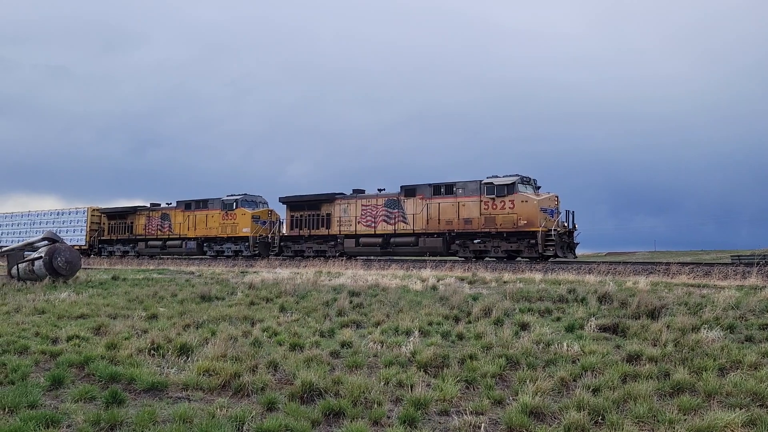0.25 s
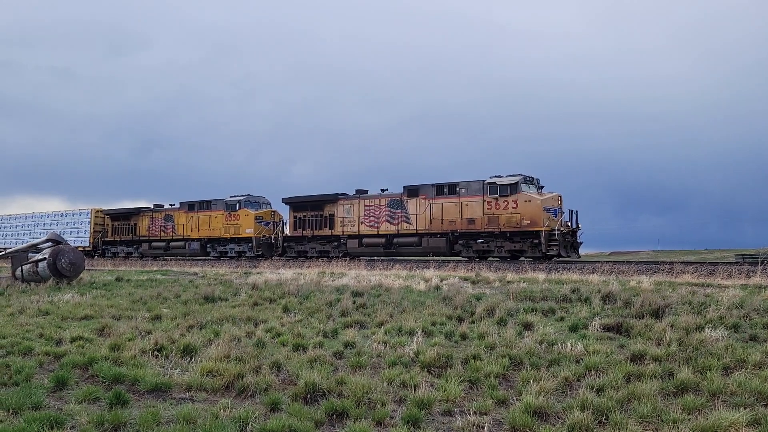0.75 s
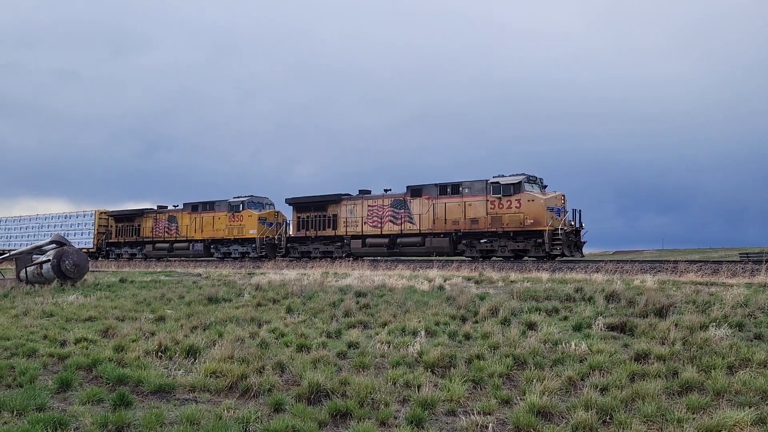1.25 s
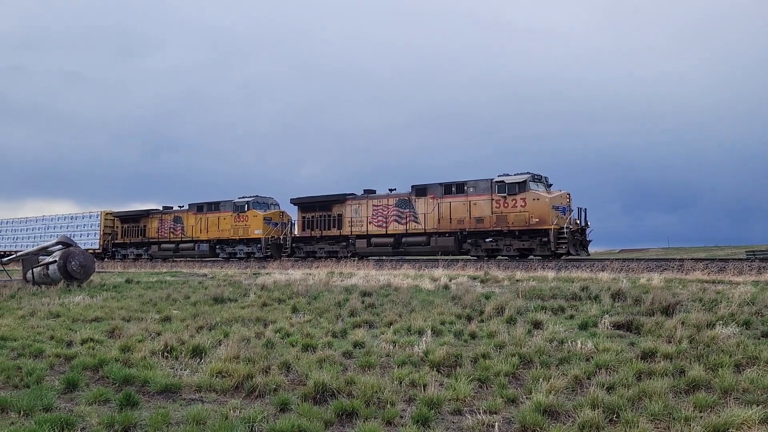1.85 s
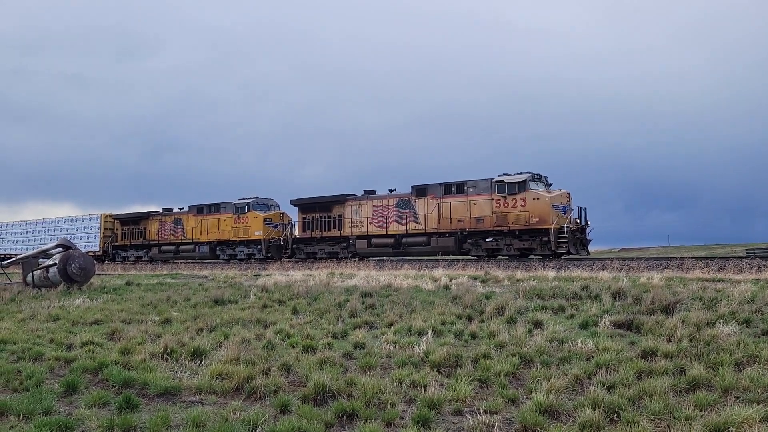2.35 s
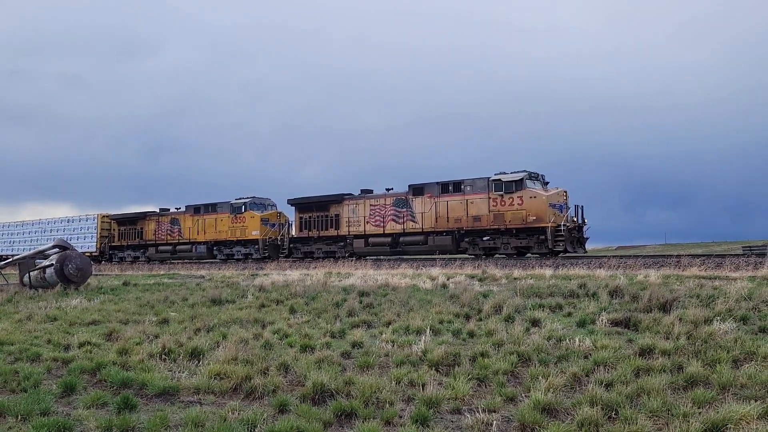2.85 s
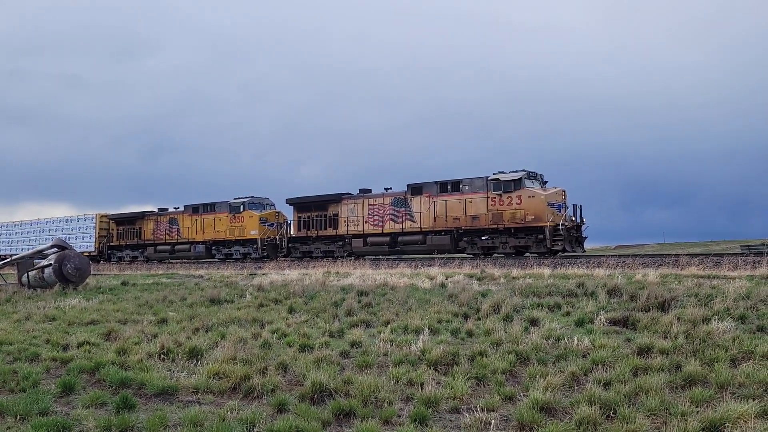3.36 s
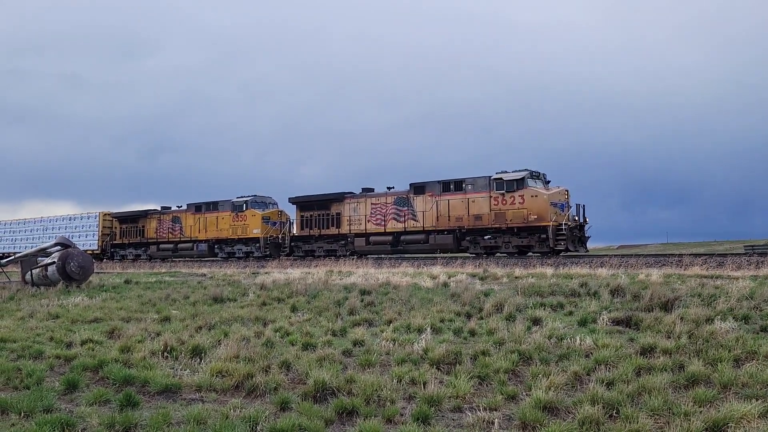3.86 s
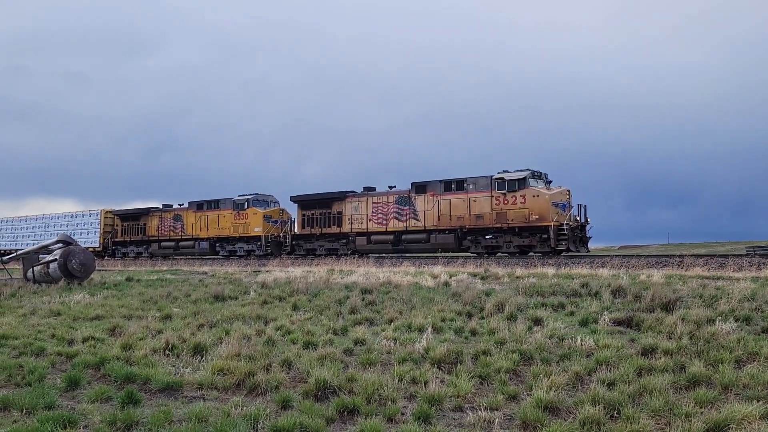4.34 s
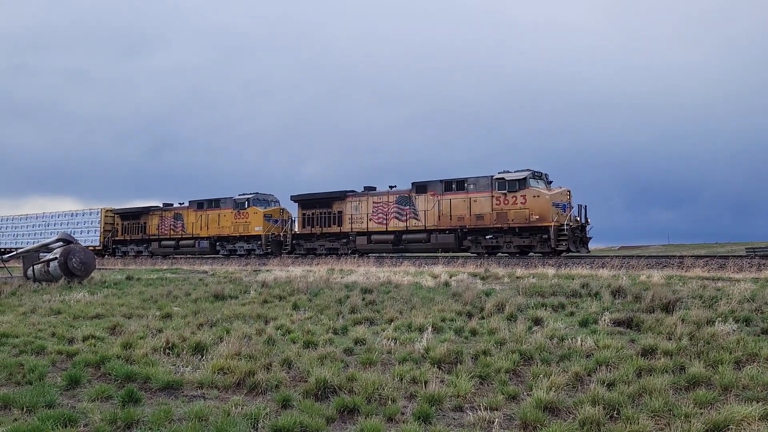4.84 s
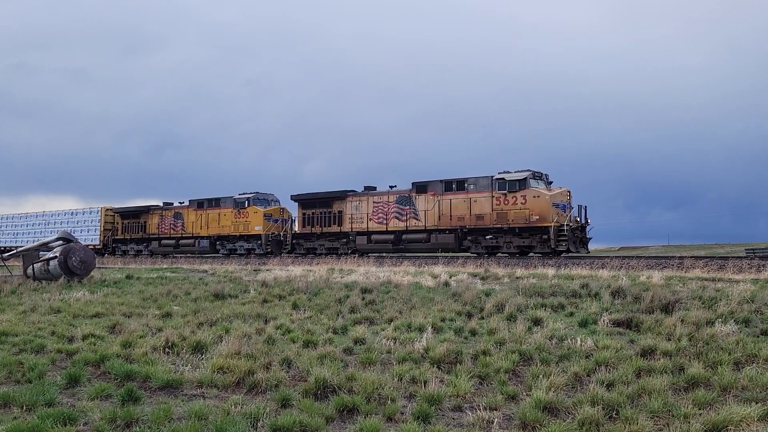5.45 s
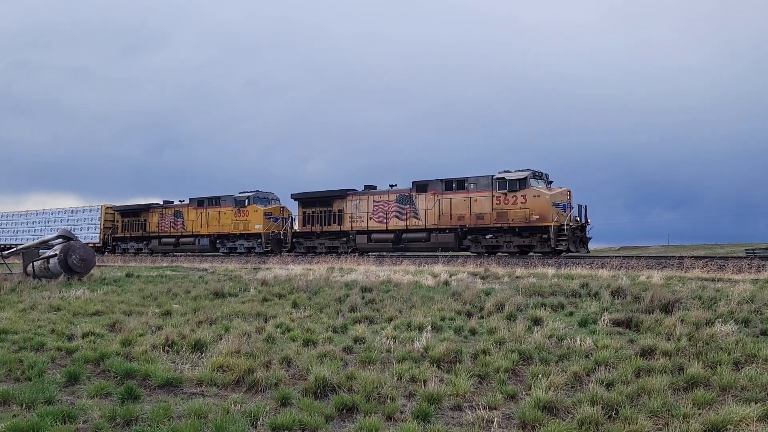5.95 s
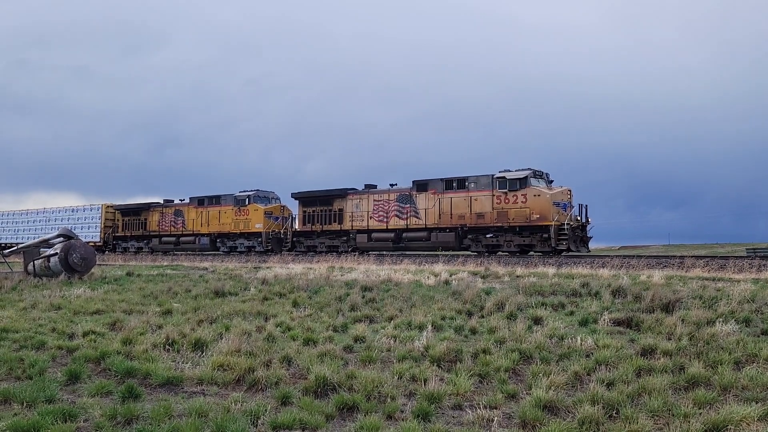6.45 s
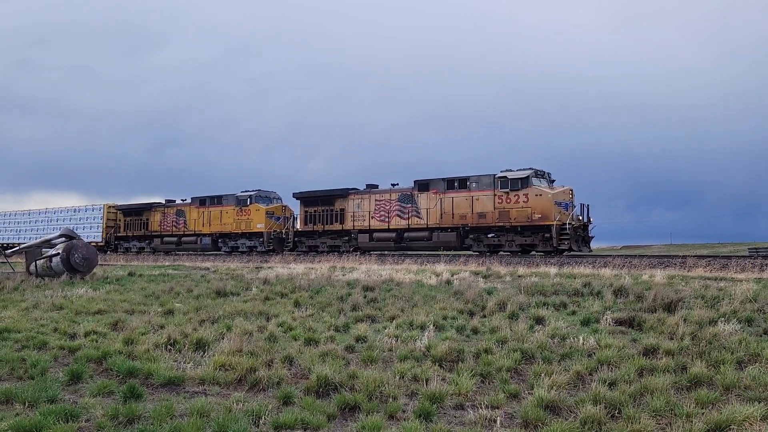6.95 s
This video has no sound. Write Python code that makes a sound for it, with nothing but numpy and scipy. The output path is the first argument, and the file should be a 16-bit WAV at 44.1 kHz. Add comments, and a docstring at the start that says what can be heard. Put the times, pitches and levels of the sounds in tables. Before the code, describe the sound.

Two diesel locomotives creep past at idle on open grassland. Their exhaust throbs unevenly on one deep note under roaring fans, a fast engine clatter and a thin whine that fades in and out. Air valves spit sharply at odd moments over a light hiss, with faint metallic ticks and brief rattles of loose parts. Wind buffets the microphone, mostly on the right, gusting more often in the second half.

```python
"""Two diesel locomotives creep past at idle on open grassland, at the head of a freight train.
Their exhaust surges unevenly on one deep note, with faint metallic ticks mostly in time with the engine.
Fans roar, a blower whines, the engines shake loose parts, and air valves spit at odd moments.
Wind buffets the microphone, mostly on the right."""
import sys
import numpy as np
from scipy import signal
from scipy.fft import rfft, irfft
from scipy.io import wavfile

SR = 44100
rng = np.random.default_rng(int(sys.argv[2]) if len(sys.argv) > 2 else 0)


def dump(signal):
    """Clip the signal to [-1, 1] and save it as 16-bit WAV at the path in sys.argv[1]."""
    limited = np.clip(np.atleast_2d(signal).T, -1, 1)
    pcm = np.round(limited * 32767).astype(np.int16)
    wavfile.write(sys.argv[1], SR, pcm)


N = 317520
T = np.arange(N) / SR
HZ = np.maximum(np.fft.rfftfreq(N, 1 / SR), 1)
ENGINE_LAG_MS, AIR_LAG_MS = .18, .62   # how much later these sounds reach the left side
TO_RIGHT = np.array([[-.5], [.5]])   # splits a dB difference: left down, right up


def from_db(db):
    """Turn decibels into a gain."""
    return 10 ** (np.asarray(db) / 20)

def rms_one(x):
    """Scale a signal to an average power of 1."""
    return x / np.sqrt(np.mean(x ** 2) + 1e-20)

def in_time(rows):
    """Join a table's points into one curve over time for each level column."""
    times, *columns = np.transpose(rows)
    return [np.interp(T, times, column) for column in columns]

def swell(peak_s, length_s):
    """A smooth rise and fall around one moment."""
    return np.exp(-np.minimum(((T - peak_s) / length_s) ** 2, 40))

def strokes(rate_hz, first_s):
    """A regular beat that swings between -1 and 1."""
    return np.cos(2 * np.pi * rate_hz * (T - first_s))

def drift(rate_hz):
    """A random wobble of about 1 either way, mostly slower than rate_hz."""
    return rms_one(irfft(rfft(rng.standard_normal(N)) / (1 + (HZ / rate_hz) ** 2), N))

def colour(points):
    """Join a table's points into dB at every pitch, falling steeply past the last."""
    hz, db = np.transpose(points)
    return np.interp(np.log(HZ), np.log(hz), db) - 20 * np.maximum(np.log2(HZ / hz[-1]), 0)

def band(hz, width_hz):
    """One steep-sided band, in dB at every pitch."""
    return -20 * np.log10(1 + ((HZ - hz ** 2 / HZ) / width_hz) ** 4)

# How the microphone's two sides differ: pitch_hz, left_minus_right_db
MIC_BALANCE = [(60, 6), (98, -4), (160, 5.5), (260, 0.5), (430, -1.5), (700, 0), (1140, -7), (1860, -1),
               (3040, -0.5), (3900, -8.5), (4970, -9.5), (8110, 1), (13200, -6.5)]
def noise(spectrum_db, alike, lag_ms=0):
    """Shaped stereo noise; the share `alike` reaches both sides, the left one lag_ms later."""
    shared, *own = rfft(rng.standard_normal((3, N)))
    direct = np.array([shared * np.exp(-2j * np.pi * HZ * lag_ms / 1000), shared])
    both = np.sqrt(alike) * direct + np.sqrt(1 - alike) * np.array(own)
    return rms_one(irfft(both * from_db(spectrum_db - colour(MIC_BALANCE) * TO_RIGHT), N))


# Booms from the exhaust stack: peak_s, level_db, length_s, pitch_hz
EXHAUST_SURGES = [(0.002, -17, 0.054, 58), (0.694, -25, 0.022, 63), (0.796, -20, 0.03, 64),
                  (0.927, -21, 0.019, 66), (1.102, -21, 0.053, 64), (1.268, -27, 0.016, 60),
                  (1.726, -26.5, 0.057, 62.3), (1.877, -24, 0.041, 62.4), (2.009, -21, 0.021, 64),
                  (2.158, -22.5, 0.05, 64), (2.586, -24.5, 0.012, 62.5), (2.677, -28, 0.019, 59),
                  (2.816, -23.5, 0.029, 57), (2.955, -22, 0.027, 66.4), (3.078, -18.5, 0.02, 66.5),
                  (3.21, -12.5, 0.013, 69), (4.025, -19.5, 0.032, 61.7), (4.152, -26, 0.028, 62),
                  (4.331, -14.5, 0.014, 74.4), (4.4, -30, 0.026, 63), (4.51, -28, 0.03, 68.6),
                  (4.606, -31, 0.037, 66.3), (4.91, -21.5, 0.025, 62.7), (4.978, -11.5, 0.0098, 67),
                  (5.1, -31, 0.036, 68), (5.226, -25.5, 0.01, 65), (5.39, -21.5, 0.065, 65),
                  (5.563, -22.5, 0.013, 65.4), (5.744, -26.5, 0.072, 65.7), (6.294, -26, 0.015, 65),
                  (6.457, -22.5, 0.052, 62.7), (6.818, -30, 0.056, 62), (6.981, -23, 0.011, 58),
                  (7.126, -31, 0.021, 65)]
# Tone of the engine blocks' rumble: pitch_hz, relative_db
RUMBLE_TONE = [(15, -30), (32, -4), (60, 9.5), (95, -2.5), (140, -8.5), (185, -8), (260, -25), (380, -17.5),
               (520, -16), (800, -61)]
def exhaust(firing_hz=64.2, note_db=-33, rumble_db=-34):
    """Each surge is a few strong firings in step with the engine's note, over a low rumble."""
    cycles = firing_hz * T + .1 * drift(4.5)   # the timing strays a little
    surges = 0
    for peak_s, db, length_s, hz in EXHAUST_SURGES:
        firings = np.cos(2 * np.pi * (cycles + (hz - firing_hz) * (T - peak_s)))
        surges += from_db(db) * swell(peak_s, length_s) * firings
    note = from_db(note_db) * np.cos(2 * np.pi * cycles)
    rumble = from_db(rumble_db) * noise(colour(RUMBLE_TONE), alike=1, lag_ms=ENGINE_LAG_MS)
    return np.sqrt(2) * (surges + note) * from_db(TO_RIGHT) + rumble

# Loudness of the drone: time_s, level_db
DRONE_LEVELS = [(0.0, -47), (0.52, -47), (0.96, -46.5), (1.7, -55), (2.95, -58), (3.11, -44.5), (3.79, -58),
                (4.47, -46.5), (4.91, -50), (7.2, -55.5)]
def drone(gain_db=-1):
    """A hollow drone swells and fades above the rumble."""
    hollow = noise(band(hz=350, width_hz=170), alike=.25) * [[1], [-1]]   # partly out of phase
    return from_db(in_time(DRONE_LEVELS)[0] + gain_db) * hollow

# Loudness of the machinery: time_s, roar_db, clatter_db, hiss_db
MACHINE_LEVELS = [(0.0, -41, -44, -54.5), (0.44, -41.5, -44, -54.5), (1.0, -40, -42.5, -57),
                  (1.26, -41.5, -42, -56.5), (1.98, -40.5, -43.5, -55), (2.59, -40.5, -43.5, -57.5),
                  (3.31, -40.5, -43, -54.5), (3.89, -43, -44.5, -58), (4.27, -40, -43.5, -56.5),
                  (4.91, -41.5, -44.5, -56), (5.23, -41.5, -44.5, -57.5), (5.71, -42.5, -44.5, -56.5),
                  (6.48, -42, -45.5, -58), (7.2, -41.5, -43.5, -56.5)]
# Tone of the fans: pitch_hz, relative_db
FAN_TONE = [(250, -24), (430, -22), (560, -3.5), (660, -1.5), (790, 1.5), (900, -2.5), (990, -8),
            (1150, -17.5), (1600, -42.5)]
# Tone of the clatter: pitch_hz, relative_db
CLATTER_TONE = [(700, -41.5), (1050, -11), (1220, -9.5), (1340, -7), (1480, -9), (1750, -8.5), (1950, -8),
                (2150, -16.5), (2500, -24), (3000, -25), (4500, -65.5)]
KNOCK_HZ = 14.89
def fans_and_clatter(clatter_gain_db=.84, grain_db=1.45):
    """Fans roar while the engine's valve gear knocks twice a turn, once harder."""
    roar_db, clatter_db, _ = in_time(MACHINE_LEVELS)
    knock_db = 1.2 * strokes(KNOCK_HZ, first_s=.02) + .9 * strokes(KNOCK_HZ / 2, first_s=.0027)
    fans = from_db(roar_db + knock_db / 2) * noise(colour(FAN_TONE), alike=.93, lag_ms=ENGINE_LAG_MS)
    clatter_level = from_db(clatter_db + clatter_gain_db + knock_db + grain_db * drift(9.9))
    return fans + clatter_level * noise(colour(CLATTER_TONE), alike=.6, lag_ms=ENGINE_LAG_MS)

# Loudness of the rasp: time_s, level_db
RASP_LEVELS = [(0, -48), (.8, -46), (1.85, -49.5), (2.1, -68), (3.15, -61), (3.4, -47), (4.9, -49),
               (6.6, -44.5), (7.2, -53)]
def rasp():
    """A narrow rasp from the engines fades away for a second and returns."""
    level = from_db(in_time(RASP_LEVELS)[0])
    return level * noise(band(hz=1230, width_hz=130), alike=.6, lag_ms=ENGINE_LAG_MS)

# Loudness of the blower: time_s, level_db
BLOWER_LEVELS = [(0.0, -47.5), (0.42, -49), (0.8, -45.5), (1.35, -53), (1.7, -45.5), (2.38, -62),
                 (2.5, -55), (2.91, -51.5), (3.17, -53.5), (3.65, -48.5), (3.85, -48.5), (4.4, -47),
                 (4.87, -51), (5.15, -45.5), (5.5, -50.5), (5.9, -45), (6.5, -46), (7.2, -57)]
# The blower's three tones: pitch_hz
BLOWER_PITCHES = [592, 806, 1184]
# Strength of each of those tones: relative_db, right_minus_left_db
BLOWER_MIX = [(-1, 12), (-15.5, -16.5), (-9, 14.5)]
def blower_whine(gain_db=-2, waver=.00226, flutter=.00606, fading_db=1.24):
    """The blower's thin tones fade in and out in the moving air."""
    blower_db = in_time(BLOWER_LEVELS)[0] + gain_db
    out = 0
    for hz, (db, right_db) in zip(BLOWER_PITCHES, BLOWER_MIX):
        pitch_hz = hz * (1 + waver * drift(4.94) + flutter * drift(40))
        phase = 2 * np.pi * np.cumsum(pitch_hz) / SR
        left_lag = 2 * np.pi * hz * ENGINE_LAG_MS / 1000 * np.array([[1], [0]])
        level = from_db(blower_db + db + fading_db * drift(2) + right_db * TO_RIGHT)
        out += np.sqrt(2) * level * np.sin(phase - left_lag)
    return out

# Tone of the hiss: pitch_hz, relative_db
HISS_TONE = [(1800, -0.5), (2550, -10), (3250, -2.5), (3900, -3), (4900, -4.5), (5700, -2.5), (6500, -6.5),
             (7400, -9), (8300, -23), (9600, -23.5), (10500, -31.5), (12500, -28), (16000, -43.5)]
def air_hiss(gain_db=-.1, compressor_hz=11.16):
    """Air hisses, a little harder with each compressor stroke and valve knock."""
    rhythm_db = strokes(compressor_hz, first_s=.0014) + .9 * strokes(KNOCK_HZ, first_s=.012)
    level = from_db(in_time(MACHINE_LEVELS)[2] + gain_db + rhythm_db + drift(18))
    return level * noise(colour(HISS_TONE), alike=.21, lag_ms=AIR_LAG_MS)

# The breeze between gusts: time_s, level_db
BREEZE_LEVELS = [(0, -36), (1.1, -32), (1.6, -38), (2.1, -35), (2.7, -33.5), (3.4, -31.5), (3.8, -35.5),
                 (4.6, -29), (5.1, -39), (5.95, -41), (6.4, -33.5), (7.2, -37.5)]
# Gusts that thump the microphone: peak_s, level_db, length_s
WIND_GUSTS = [(0.254, -25.5, 0.056), (0.769, -34.5, 0.35), (3.238, -25, 0.064), (3.541, -26.5, 0.069),
              (4.137, -28.5, 0.073), (4.323, -25, 0.045), (4.549, -28, 0.091), (4.86, -28.5, 0.12),
              (4.972, -25.5, 0.031), (5.368, -26.5, 0.088), (5.716, -26, 0.024), (6.16, -24, 0.077),
              (6.588, -30.5, 0.12), (7.12, -26, 0.014)]
# Tone of the wind: pitch_hz, relative_db
WIND_TONE = [(12, -40.5), (27, -5), (48, 1), (75, -1), (120, -10.5), (190, -18), (280, -28.5), (500, -55),
             (1200, -95.5)]
def wind(right_db=8.5, left_swing=.4, lumps_db=2, tear_db=-12, tear_hz=300):
    """Swirls hit each side, the sheltered left one less; the hardest gusts add a higher, tearing sound."""
    gust_power = sum((from_db(db) * swell(peak_s, length_s)) ** 2 for peak_s, db, length_s in WIND_GUSTS)
    wind_db = 10 * np.log10(from_db(in_time(BREEZE_LEVELS)[0]) ** 2 + gust_power)
    left_db = wind_db.mean() + left_swing * (wind_db - wind_db.mean())
    sides_db = np.array([left_db, wind_db + right_db])
    wobble_db = lumps_db * np.array([drift(6.5), drift(33)])
    buffet = from_db(sides_db + wobble_db) * noise(colour(WIND_TONE), alike=.063)
    tear = noise(-10 * np.log2(HZ / tear_hz) ** 2, alike=0)
    tear_level = from_db(wind_db.max() + tear_db + 1.79 * (sides_db - sides_db.max()))
    return buffet + tear_level * tear

# Notes the steel rings at: pitch_hz, width_hz, struck_db, above_hiss_db
STEEL_NOTES = [(2700, 230, -0.5, -28.5), (3330, 200, 1.5, -18), (3830, 200, -0.5, -20),
               (4860, 410, 1.5, -11), (5320, 190, 2, -17), (5760, 150, -2.5, -25.5), (6180, 480, -4.5, -19)]
# Faint, bright, ringing ticks, mostly in time with the idling engine: peak_s, level_db, brightest_hz
METALLIC_TICKS = [(.272, -62, 4800), (.447, -59, 5800), (.745, -57, 5740), (1.023, -61.5, 5600),
                  (1.424, -58, 4830), (1.61, -56, 5000), (1.708, -60, 5200), (1.818, -59, 5160),
                  (1.969, -59, 5700), (2.157, -60, 5500), (2.24, -58, 3360), (2.327, -60, 4100),
                  (2.943, -61, 4440), (3.969, -61, 4880), (4.309, -64.5, 5600), (4.395, -61, 4200),
                  (6.119, -59.5, 4550), (6.256, -62, 5850)]
def ringing_steel(rise_s=.014, fade_s=.15, reach_octaves=.82, uneven_db=2.5, shimmer_db=2.6):
    """Steel rings faintly all the time; each tick sets off the notes near its own pitch."""
    hiss_db = in_time(MACHINE_LEVELS)[2]
    ticks = np.array([from_db(db - 60 * np.clip(T - peak_s, 0, 1) / fade_s)
                      * np.where(T < peak_s, swell(peak_s, rise_s), 1)
                      for peak_s, db, _ in METALLIC_TICKS])
    tick_hz = np.array(METALLIC_TICKS)[:, 2]
    out = 0
    for hz, width_hz, struck_db, above_hiss_db in STEEL_NOTES:
        closeness = np.exp(-(np.log2(hz / tick_hz) / reach_octaves) ** 2)
        struck = (closeness * from_db(struck_db + uneven_db * rng.standard_normal(len(ticks)))) @ ticks
        steady = from_db(hiss_db + above_hiss_db + shimmer_db * drift(8.2))
        ring_db = np.maximum(band(hz, width_hz), 8 + band(hz, width_hz=55))   # a thin, louder core
        out += steady * noise(ring_db, alike=.4, lag_ms=AIR_LAG_MS)
        out += struck * noise(band(hz, 2 * width_hz), alike=.44, lag_ms=AIR_LAG_MS)
    return out

# Rattles of loose parts: peak_s, level_db, pitch_hz, width_hz, length_s
LOOSE_PARTS = [(0.697, -35.5, 1180, 1000, 0.029), (0.77, -40.5, 1200, 160, 0.021),
               (1.828, -35.5, 1265, 128, 0.016), (2.435, -37, 1830, 198, 0.017),
               (3.916, -40, 1700, 520, 0.03), (5.336, -42.5, 1900, 210, 0.045),
               (5.446, -44.5, 1980, 204, 0.075), (6.13, -40, 1264, 200, 0.02),
               (6.538, -44, 1906, 193, 0.18), (7.13, -39.5, 1332, 795, 0.022)]
def rattles():
    """The engine shakes loose parts; each rings for an instant at one rough pitch."""
    out = 0
    for peak_s, db, hz, width_hz, length_s in LOOSE_PARTS:
        ring = noise(band(hz, width_hz), alike=.81, lag_ms=ENGINE_LAG_MS)
        out += from_db(db) * swell(peak_s, length_s) * ring
    return out

def comb_ripple(delay_ms=1.235, share=.26):
    """Evenly spaced peaks and dips, about 800 Hz apart, colour the spits of air, in dB."""
    return 20 * np.log10(abs(1 + share * np.exp(-2j * np.pi * HZ * delay_ms / 1000)))

def scatter(step_hz=170, spread_db=2.4):
    """Bounces between steel parts leave random peaks and dips in the tone, in dB."""
    hz = np.arange(0, SR / 2, step_hz)
    return spread_db * np.interp(HZ, hz, rng.standard_normal(len(hz)))

def resonance(hz, width_hz=400, height_db=7):
    """One rounded peak where a spit rings, in dB at every pitch."""
    return height_db / (1 + (2 * (HZ - hz) / width_hz) ** 2)

# Spits of air: time_s, level_db, length_s, tilt_db_per_octave, low_ring_hz, mid_ring_hz, top_ring_hz
VALVE_SPITS = [(0.862, -42.5, 0.011, 0, 4400, 7650, 10300), (0.889, -43, 0.022, -7, 5160, 5670, 10200),
               (1.16, -37.5, 0.025, -2.5, 5160, 6060, 10100),
               (1.345, -34.5, 0.013, -0.5, 5100, 6400, 12000), (2.058, -33.5, 0.011, -4, 4140, 6450, 12200),
               (2.675, -35.5, 0.0098, -4, 4630, 6200, 12600), (3.346, -36.5, 0.019, -2, 4200, 6060, 10900),
               (3.354, -35, 0.0075, -2, 4180, 5100, 11000), (3.618, -43, 0.021, -7, 4800, 7200, 10400),
               (3.625, -33.5, 0.0087, -2, 5060, 7050, 11800), (4.912, -35, 0.014, -3.5, 5300, 6100, 12000),
               (5.521, -38.5, 0.023, -4, 5300, 7000, 12100), (5.984, -35, 0.012, -3, 4200, 4650, 11800),
               (6.940, -42.5, 0.0087, -0.5, 3300, 4500, 12600)]
# Tone of the air jet: pitch_hz, relative_db
JET_TONE = [(1350, -35.5), (2300, -14.5), (2880, -16), (3390, -2), (3880, -3), (4440, -2.5), (5550, -3.5),
            (6160, 0), (7370, -1.5), (8310, -14), (10000, -8.5), (12300, -11.5), (13900, -21.5)]
def valve_spits(burst_db=-1, near_db=-7, near_fade_s=.16, far_db=-14, far_fade_s=.38, dull_hz=7500):
    """A valve cracks open and a jet of air echoes off nearby steel, then, duller, along the train."""
    jet_db = np.maximum(colour(JET_TONE), .5 + band(hz=1550, width_hz=1300)) + comb_ripple()
    close, far_power = 0, 0
    for time_s, db, length_s, tilt, *rings_hz in VALVE_SPITS:
        peak_s = time_s - length_s / 4
        puff = swell(peak_s, length_s * np.where(T < peak_s, .35, 1))   # opens faster than it shuts
        crack = .9 * swell(peak_s, length_s=.0009)
        age_s = np.maximum(T - time_s, 0)
        onset = np.clip((T - peak_s) / length_s * 2, 0, 1)
        near_echo = onset * from_db(near_db - 60 * age_s / near_fade_s)
        far_power += onset * from_db(db + far_db - 60 * age_s / far_fade_s) ** 2
        tone_db = jet_db + scatter() + sum(resonance(hz) for hz in rings_hz) + tilt * np.log2(HZ)
        level = from_db(db) * np.hypot(from_db(burst_db) * (puff + crack), near_echo)
        close += level * noise(tone_db, alike=.12, lag_ms=AIR_LAG_MS)
    dull_db = jet_db - 20 * np.log10(1 + (HZ / dull_hz) ** 4)
    far_echo = np.sqrt(far_power) * noise(dull_db, alike=.086, lag_ms=AIR_LAG_MS)
    sputter_db = 3 * drift(440)
    return close * from_db(sputter_db + 2 * TO_RIGHT) + far_echo

def scene():
    """Engines, wind, ringing steel and valves in the open air."""
    engines = exhaust() + drone() + fans_and_clatter() + rasp() + blower_whine()
    return engines + air_hiss() + wind() + ringing_steel() + rattles() + valve_spits()

def record(dry, cutoff_hz=16200):
    """Cut away the very highest treble."""
    return signal.sosfilt(signal.cheby2(14, 60, cutoff_hz, fs=SR, output="sos"), dry)


dry = scene()
out = record(dry)
dump(out)
```